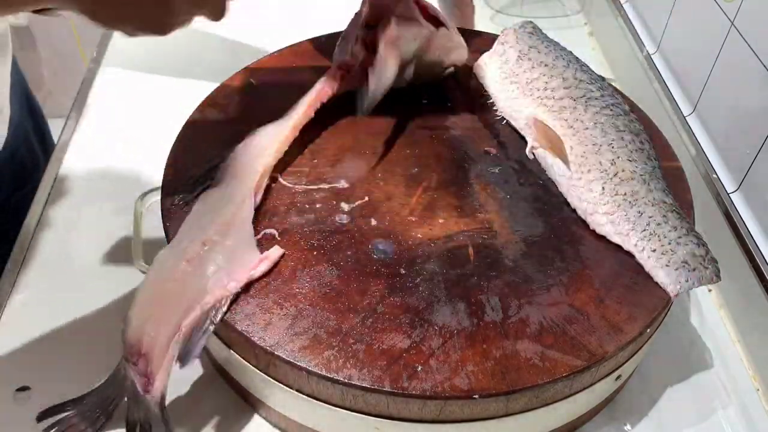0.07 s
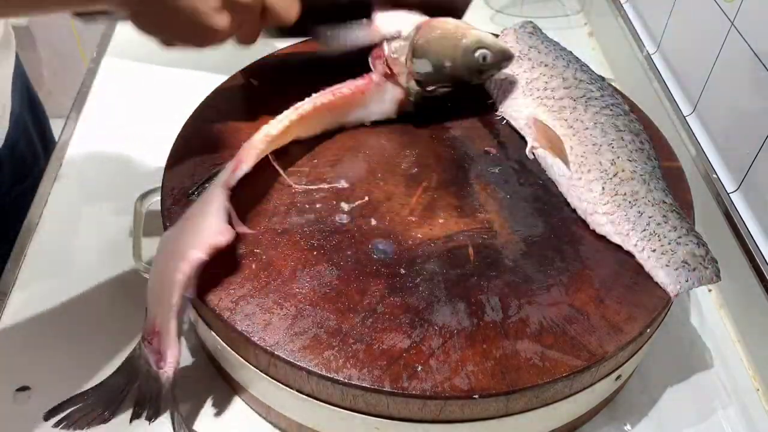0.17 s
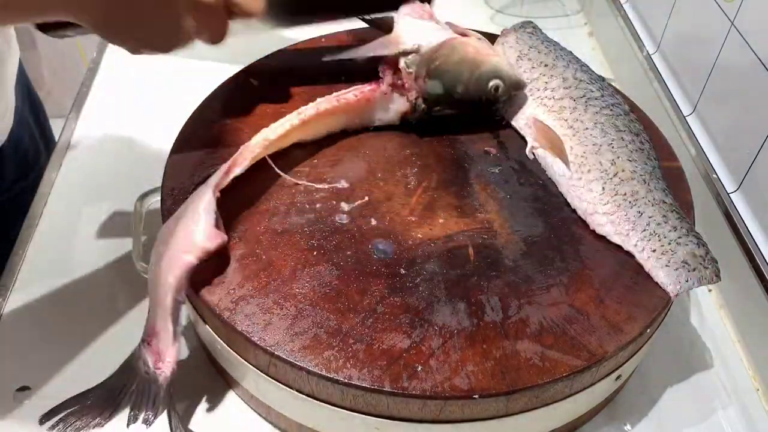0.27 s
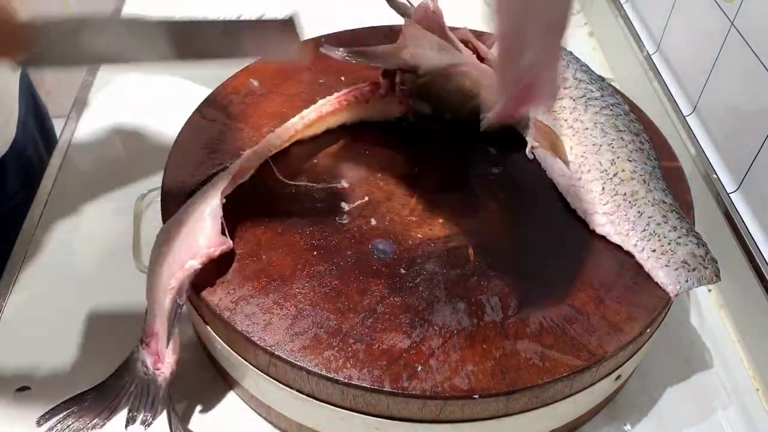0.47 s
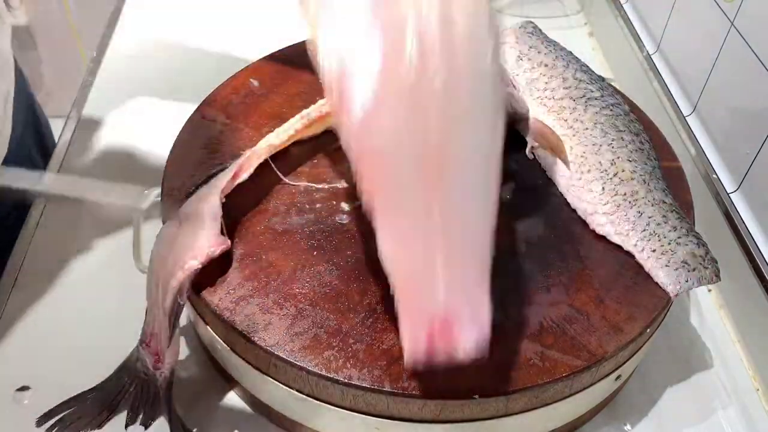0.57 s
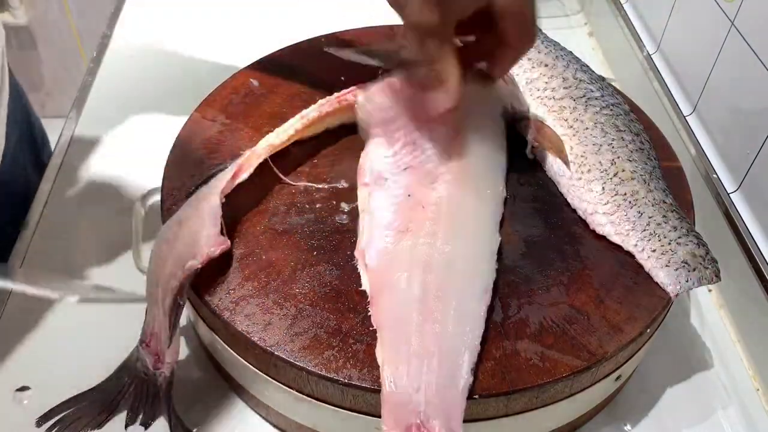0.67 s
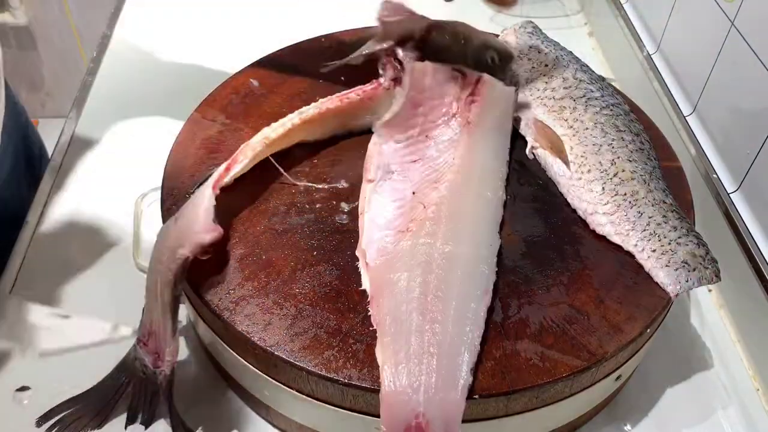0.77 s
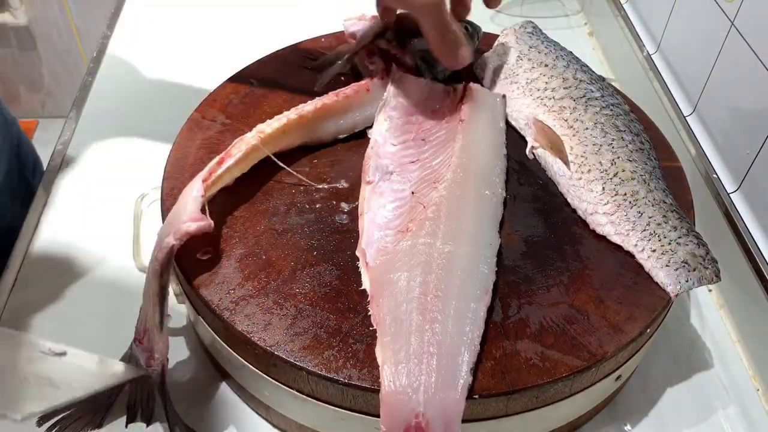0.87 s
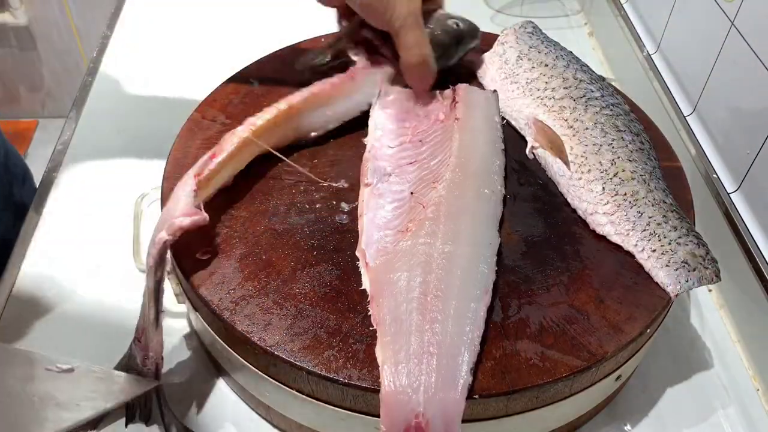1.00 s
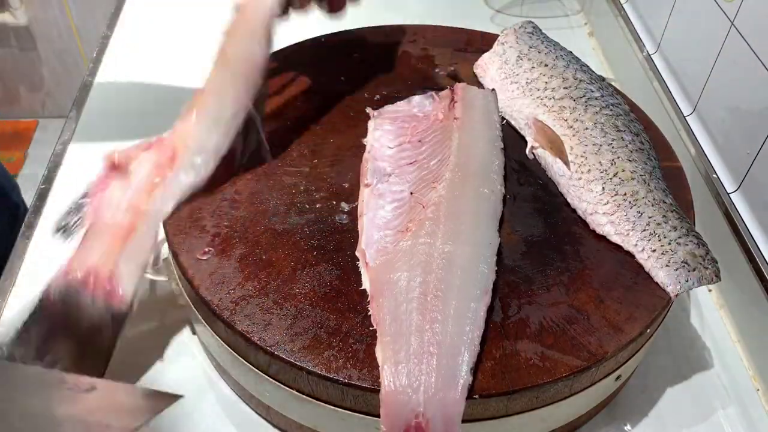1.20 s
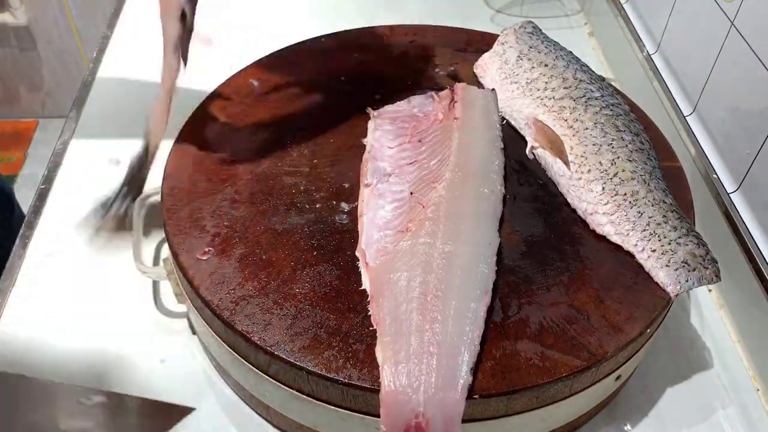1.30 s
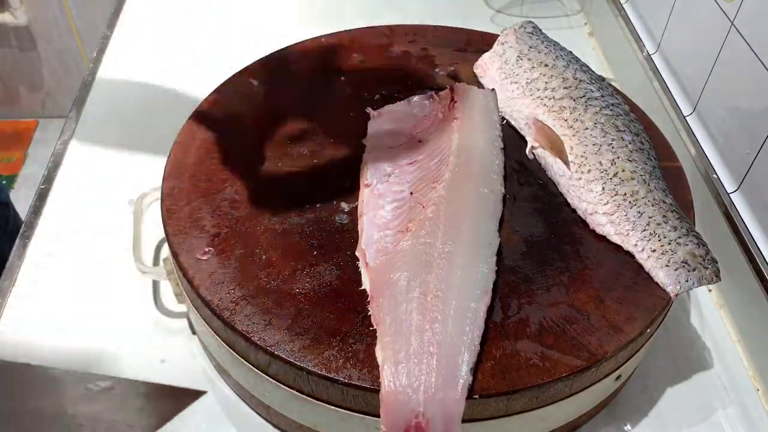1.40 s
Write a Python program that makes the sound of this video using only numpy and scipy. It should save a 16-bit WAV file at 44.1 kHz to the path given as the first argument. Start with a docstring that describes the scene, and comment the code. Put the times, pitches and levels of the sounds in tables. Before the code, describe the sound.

One wet slap of fish on a chopping board, then a light swish and ticks.

```python
"""Wet fish on a chopping board

A wet fish is flopped onto a thick wooden board in a tiled kitchen: its skin smears, then it lands
with one slap and a thud. A fillet is laid down with a wet swish; soft bumps, small plops of trapped
air and sticky ticks come as the pieces are handled. The hard room rings briefly over a low rumble."""
import sys
import numpy as np
from scipy import signal
from scipy.fft import rfft, irfft, next_fast_len
from scipy.io import wavfile
from scipy.ndimage import map_coordinates

SR = 44100
rng = np.random.default_rng(int(sys.argv[2]) if len(sys.argv) > 2 else 0)


def unload_wav(signal):
    """Save mono or channel-first audio to the path in sys.argv[1] as 16-bit WAV at rate SR, clipped to [-1, 1]."""
    wavfile.write(
        sys.argv[1],
        SR,
        np.round(np.clip(np.atleast_2d(signal).T, -1, 1) * 32767).astype(np.int16),
    )


N = 63945


def amp(db):
    """Decibels to gain."""
    return 10 ** (np.asarray(db) / 20)


def unit(x):
    """Scale to rms 1."""
    return x / np.sqrt(np.mean(x ** 2) + 1e-20)


def along(points, hz):
    """Interpolate (Hz, value) points on a log axis."""
    point_hz, values = np.transpose(points)
    return np.interp(np.log(hz + 1), np.log(point_hz + 1), values)


def filtered(x, response):
    """Apply a complex frequency response."""
    size = next_fast_len(N + SR // 2)
    hz = np.fft.rfftfreq(size, 1 / SR)
    return irfft(rfft(x, size) * response(hz), size)[..., :N]


def noise(spectrum):
    """Coloured noise of rms 1."""
    return unit(filtered(rng.standard_normal(N), lambda hz: amp(along(spectrum, hz))))


def resonant_noise(centre_hz, q):
    """Noise of rms 1 through two equal band-passes."""
    band = lambda hz: 1j * hz * centre_hz / (centre_hz ** 2 - hz ** 2 + 1j * hz * centre_hz / q)
    return unit(filtered(rng.standard_normal(N), lambda hz: band(hz) ** 2))


def wobble(knots_per_s):
    """A smooth random curve."""
    return map_coordinates(rng.standard_normal(N), [np.arange(N) * knots_per_s / SR], mode="wrap")


def since(start):
    """Seconds since start, zero before it."""
    return np.maximum(np.arange(N) / SR - start, 0)


def envelope(start, attack_s, hold_s, t60_s):
    """Linear rise, hold, exponential release."""
    rise = np.minimum(since(start) / attack_s, 1)
    return rise * amp(-60 * since(start + attack_s + hold_s) / t60_s)


def ring(start, hz, attack_s, t60_s, drift_rad=0):
    """One damped mode with a soft start."""
    t = since(start)
    rise = 1 - np.exp(-t / attack_s)
    return np.sin(2 * np.pi * hz * t + drift_rad) * rise * amp(-60 * t / t60_s)


# Each row: frequency in Hz, left-right coherence of diffuse sound.
COHERENCE = [(60, 1), (300, 1), (700, .7), (1300, 0.099), (5500, 0.58), (7500, 0.66), (10500, 1),
             (13000, 1)]

def diffuse(pair):
    """Blend two unrelated signals into left and right of a diffuse field."""
    angle = lambda hz: np.arccos(along(COHERENCE, hz)) / 2
    mid, side = filtered(pair, lambda hz: np.array([np.cos(angle(hz)), np.sin(angle(hz))]))
    return np.array([mid + side, mid - side])


# Kitchen background. Each row: frequency in Hz, relative density in dB.
RUMBLE_SPECTRUM = [(20, -9.5), (35, 1), (60, -0.5), (90, -4.5), (125, -3.5), (200, -13), (400, -17.5),
                   (800, -22.5), (1500, -28), (3000, -36.5), (6000, -45), (8500, -51.5), (10500, -53),
                   (12500, -52), (14500, -65.5)]

def rumble():
    """A low, slightly restless rumble with faint hiss."""
    level_db = -56 + 0.33 * wobble(8.3)
    return amp(level_db) * diffuse(np.array([noise(RUMBLE_SPECTRUM), noise(RUMBLE_SPECTRUM)]))


def wet_strokes(strokes, spectrum, grain_db=1.5, grains_per_s=820):
    """A wet surface meets the board in a fizz of tiny grains, spread in space."""
    level = sum(amp(db) * envelope(start, attack, hold, t60) for start, attack, hold, t60, db in strokes)
    grains = unit(amp(grain_db * wobble(grains_per_s)))
    return level * grains * diffuse(np.array([noise(spectrum), noise(spectrum)]))


# Skin slides. Each row: start, attack, hold and t60 in seconds, level in dB.
SMEAR_STROKES = [(0.129, 0.033, 0.013, .05, -58.5), (.1628, 0.0011, 0.0018, 0.016, -42.5),
                 (.205, 0.0099, 0.0011, 0.022, -39), (.223, 0.0016, 0.0071, 0.031, -40)]
# Film under the skin. Each row: frequency in Hz, relative density in dB.
SKIN_SPECTRUM = [(300, -14), (1200, -3.5), (1900, -13.5), (2750, 0), (3300, -12.5), (4500, -8.5),
                 (5100, -6), (6200, -8), (8100, 1), (9800, -4), (10500, 9.5), (11300, -5.5), (12400, 2.5),
                 (13500, -15)]

def smears():
    """Skin slides over the board on a thin wet film."""
    return wet_strokes(SMEAR_STROKES, SKIN_SPECTRUM)


# Weight settling. Each row: start in seconds, level in dB, upper mode in relative dB, attack in seconds.
SOFT_LOADS = [(0.171, -29.5, 0, 0.033), (0.333, -37, 0, .01), (.43, -44, -1, 0.011),
              (0.71, -33.5, -16.5, 0.034), (0.767, -36, -54, .012), (0.911, -40.5, -26, 0.0089),
              (1.07, -42, -2.5, 0.0069)]

def bumps(lower_hz=69, upper_hz=126, t60_s=0.22):
    """Soft loads stir only the two lowest modes of the board on its counter."""
    return sum(amp(db) * (ring(start, lower_hz, attack, t60_s)
                          + amp(upper_db) * ring(start, upper_hz, attack, t60_s))
               for start, db, upper_db, attack in SOFT_LOADS)


# Air under the flesh. Each row: start in seconds, pitch in Hz, level in dB, attack and t60 in seconds.
AIR_POCKETS = [(0.1786, 1031, -34.5, 0.0019, 0.027), (0.182, 364, -36.5, 0.00075, 0.017),
               (.753, 945, -33, 0.0018, 0.033), (0.898, 965, -50, 0.0038, 0.065),
               (0.9754, 1196, -50, 0.0007, 0.017), (.977, 822, -40, 0.0047, 0.057)]

def plops(puff_db=-19):
    """Each air pocket pops with a brief unsteady ring and a soft puff."""
    out = np.zeros(N)
    for start, hz, db, attack, t60 in AIR_POCKETS:
        tone = ring(start, hz, attack, t60, drift_rad=.2 * wobble(600))
        puff = amp(puff_db) * resonant_noise(hz, q=4) * envelope(start, attack, 0, t60)
        out += amp(db) * (tone + puff)
    return out


SLAP_S, SLAP_DB = .2558, -11.5
# Flesh touching down. Each row: frequency in Hz, relative density in dB.
FLESH_SPECTRUM = [(100, 5.5), (500, -3), (1300, 4), (2500, -26), (5000, -10), (9000, -35), (14000, -38.5)]
# Squeezed air, then the board giving way.
# Each row: delay in seconds, pitch in Hz, level in dB re SLAP_DB, attack and t60 in seconds.
AIR_AND_BOARD_MODES = [(.0002, 1287, 5, .001, 0.0082), (.0004, 1680, -13, .0006, 0.022),
                       (.0005, 2230, -20.5, .0005, 0.0095), (.001, 910, -2, 0.0012, 0.0053),
                       (.003, 625, -1.5, .001, 0.015), (.005, 220, -9, .002, 0.033),
                       (.008, 126, -9.5, .003, 0.11), (.007, 64, -5, .012, 0.1)]

def slap(lead_s=0.012, touch_db=-29.5):
    """Flesh touches down, trapped air pops and the board thuds."""
    touch = noise(FLESH_SPECTRUM) * envelope(SLAP_S - lead_s, lead_s, hold_s=0.0042, t60_s=0.017)
    body = sum(amp(db) * ring(SLAP_S + delay, hz, attack, t60)
               for delay, hz, db, attack, t60 in AIR_AND_BOARD_MODES)
    return amp(touch_db) * touch + amp(SLAP_DB) * body


# Bursting film. Each row: frequency in Hz, relative density in dB.
CRACK_SPECTRUM = [(350, -19.5), (1200, 1.5), (2200, 3.5), (2900, -4.5), (4200, -8), (6000, -6),
                  (8800, -1.5), (9900, -9), (10600, 5), (11600, -5), (13200, -20), (14100, -40)]

def crack():
    """The wet film bursts under the landing flesh."""
    burst = envelope(SLAP_S - .0003, attack_s=0.00024, hold_s=0.0017, t60_s=0.015)
    return amp(SLAP_DB - 13.5) * noise(CRACK_SPECTRUM) * burst


# Each row: pitch in Hz, level in dB re SLAP_DB, t60 in seconds.
HIGH_BOARD_MODES = [(345.5, -35, 0.42), (421.5, -34.5, 0.46), (605.4, -26, .28), (682, -31, 0.24),
                    (815, -28, 0.13), (962, -30.5, 0.14), (1458, -34.5, 0.38), (2270, -37.5, .22)]

def board_ring():
    """The higher modes of the board ring on faintly after the slap."""
    return sum(amp(SLAP_DB + db) * ring(SLAP_S, hz, 0.0047, t60, drift_rad=0.52 * wobble(60))
               for hz, db, t60 in HIGH_BOARD_MODES)


# Sticky films and droplets. Each row: start in seconds, level in dB, centre in Hz.
SNAPS = [(0.4837, -61, 11100), (0.7528, -41, 9400), (.8212, -48.5, 8060), (0.8813, -65, 7300),
         (0.9097, -55.5, 11250), (0.9258, -66.5, 6800), (.989, -76, 8500), (1.0652, -56.5, 8750),
         (1.1132, -63.5, 7040), (1.1351, -57, 6670), (1.17, -70.5, 7400), (1.3263, -65, 10800),
         (1.3503, -51.5, 9000), (1.3543, -53.5, 8850)]

def ticks(handling_s=.8, strays_per_s=22, stray_db=-75, stray_hz=8700):
    """Slime lets go in short bright snaps, with fainter random strays during handling."""
    strays = [(handling_s + (k + 0.32 * jitter) / strays_per_s,
               stray_db + 8 * strength,
               stray_hz * np.exp(0.57 * pitch))
              for k, (jitter, strength, pitch) in enumerate(rng.standard_normal((14, 3)))]
    return sum(amp(db) * resonant_noise(hz, q=1.6)
               * envelope(start, attack_s=0.00021, hold_s=0.00047, t60_s=.008)
               for start, db, hz in SNAPS + strays)


# Fillet contacts. Each row: start, attack, hold and t60 in seconds, level in dB.
FILLET_STROKES = [(.7125, 0.0037, 0.0098, 0.1, -45), (.735, 0.002, 0.0062, 0.22, -49.5)]
# Slime fizz. Each row: frequency in Hz, relative density in dB.
SLIME_SPECTRUM = [(200, -2.5), (1000, -4), (1900, -2.5), (3000, 2), (4200, 0), (5800, -2), (8500, 2),
                  (10600, 2.5), (12600, 3), (13600, -14)]

def fillet():
    """A slimy fillet is laid down with a swish."""
    return wet_strokes(FILLET_STROKES, SLIME_SPECTRUM)


# Carcass drags. Each row: start, attack, hold and t60 in seconds, level in dB.
DRAG_STROKES = [(1.056, 0.0034, 0.014, 0.53, -67), (1.32, 0.011, 0.021, 0.041, -65.5)]
# Rubbed wood. Each row: frequency in Hz, relative density in dB.
WOOD_SPECTRUM = [(200, 9.5), (1000, -2), (2200, 1), (4300, 1.5), (5600, -5.5), (7500, -6), (10500, -16),
                 (13500, -25)]

def drags():
    """The carcass rubs faintly over the wood."""
    return wet_strokes(DRAG_STROKES, WOOD_SPECTRUM)


# Room decay. Each row: frequency in Hz, t60 in seconds.
REVERB_T60_S = [(80, 0.46), (300, 0.45), (700, 0.31), (1600, 0.46), (7000, 0.41), (13000, 0.25)]
# Room response. Each row: frequency in Hz, gain in dB.
REVERB_DB = [(60, -2), (150, -19.5), (320, -5), (600, 2.5), (1200, -7.5), (1900, -1.5), (3500, -2.5),
             (8000, -1.5), (10500, -8.5), (13000, -5)]

def kitchen(x, delay_s=0.0015, build_s=0.0064):
    """The tiled room reverberates; each frequency dies at its own rate."""
    hz, t, bands = signal.stft(rng.standard_normal((2, N)), SR, nperseg=256)
    t60 = along(REVERB_T60_S, hz)[:, None]
    unit_energy = np.sqrt(2 * np.log(1000) / (t60 * SR))
    gain = amp(along(REVERB_DB, hz))[:, None] * unit_energy
    tail = signal.istft(bands * gain * amp(-60 * t / t60), SR, nperseg=256)[1][:, :N]
    tail = diffuse(tail) * np.minimum(since(delay_s) / build_s, 1)
    return signal.fftconvolve(x[None], tail, axes=1)[:, :N]


def crack_echo(count=3, send_db=1):
    """The crack spreads differently towards each wall, so its echo is an even wash."""
    return amp(send_db) * sum(kitchen(crack()) for _ in range(count)) / np.sqrt(count)


def scene():
    """The slap and the handling sounds in the room."""
    blow = slap()
    handling = ticks() + plops() + bumps()
    skin = smears()
    flesh = fillet() + drags()
    room = kitchen(blow) + crack_echo() + kitchen(skin[0])
    room += amp(-3.0) * kitchen(flesh[0]) + amp(-3.5) * kitchen(handling)
    return crack() + blow + board_ring() + skin + flesh + handling + room + rumble()


# Each row: frequency in Hz, phase lead of the left port in radians.
LEFT_LEAD_RAD = [(30, -.45), (70, -.58), (130, -.55), (300, -.5), (650, -.45), (1200, .4), (2200, 1.3),
                 (3200, 2.5), (4400, 1.2), (5600, 2.8), (6700, .6), (7700, -.1), (9000, -1.5),
                 (10500, -3.14), (12000, -4.6), (13800, -6.3)]
# Each row: frequency in Hz, level of the left port over the right in dB.
BALANCE_DB = [(200, -.1), (600, .7), (1200, 0), (3000, .5), (4200, -2), (5600, -4.5), (7500, 0)]

def record(dry, low_cut_hz=32.6, roll_off_hz=13400, top_hz=14100):
    """Two spaced ports hear differing phase and level; deep bass and top treble are cut."""
    sides = np.array([[.5], [-.5]])
    balance = lambda hz: amp(sides * along(BALANCE_DB, hz))
    phase = lambda hz: np.exp(1j * sides * along(LEFT_LEAD_RAD, hz))
    low_cut = lambda hz: 1 - 1 / (1 + (hz / low_cut_hz) ** 4)
    high_cut = lambda hz: (hz < top_hz) / np.sqrt(1 + (hz / roll_off_hz) ** 60)
    return filtered(dry, lambda hz: balance(hz) * phase(hz) * low_cut(hz) * high_cut(hz))


dry = scene()
out = record(dry)
unload_wav(out)
```